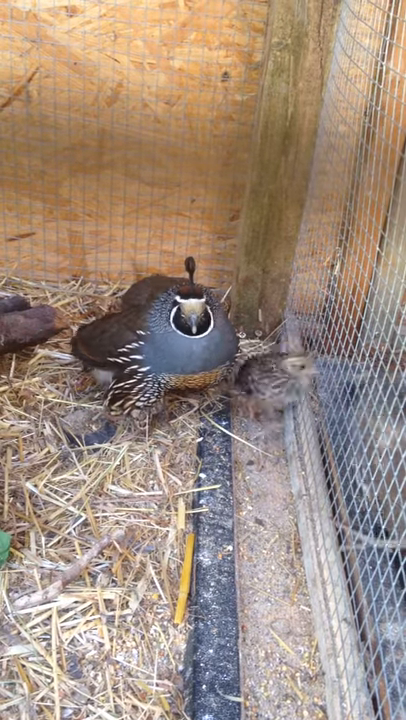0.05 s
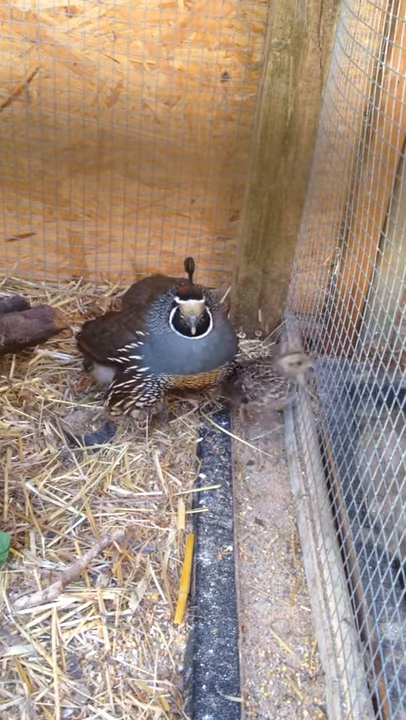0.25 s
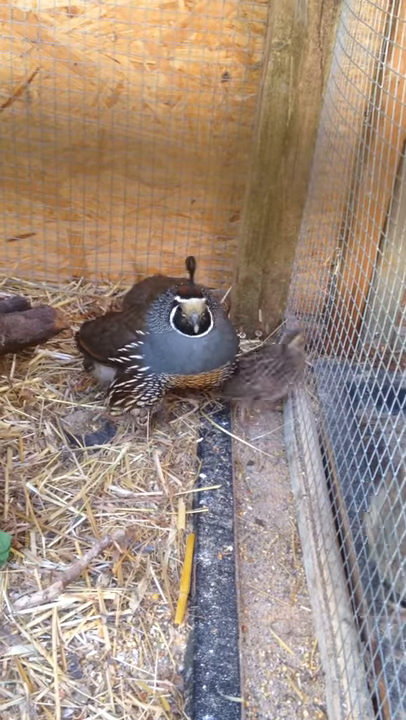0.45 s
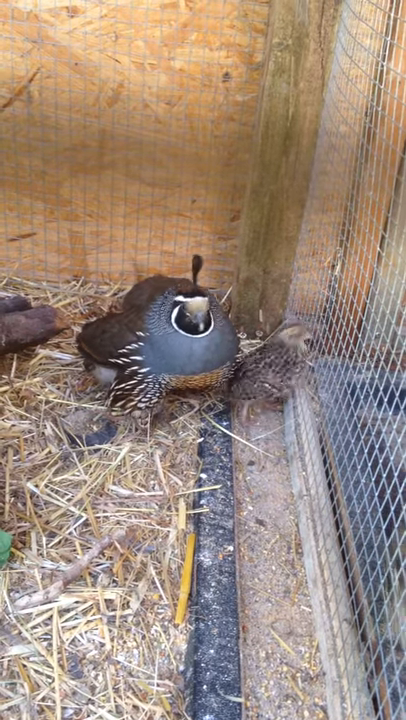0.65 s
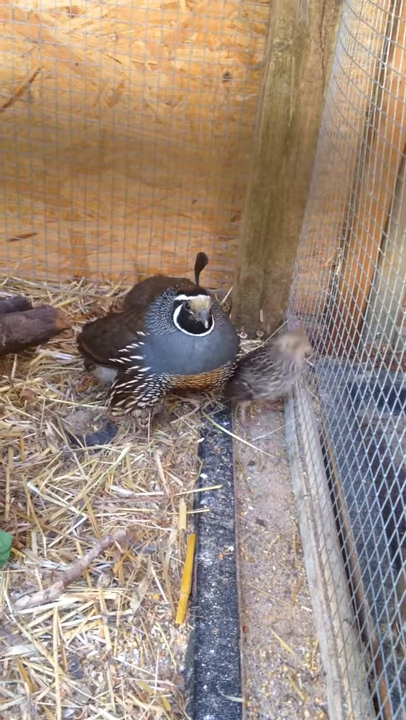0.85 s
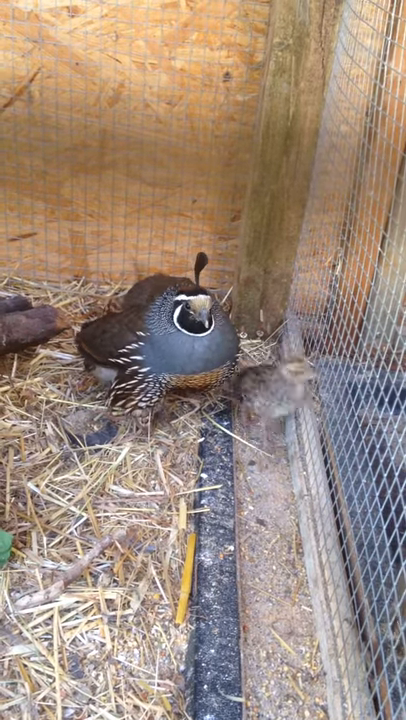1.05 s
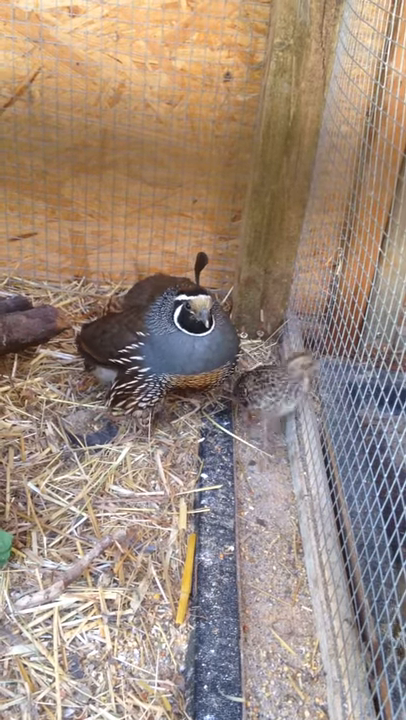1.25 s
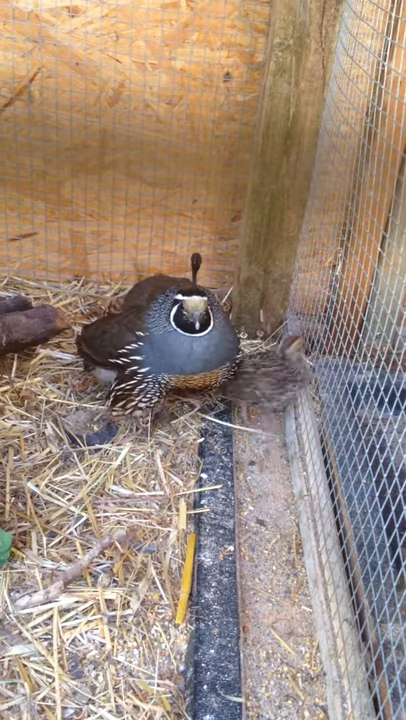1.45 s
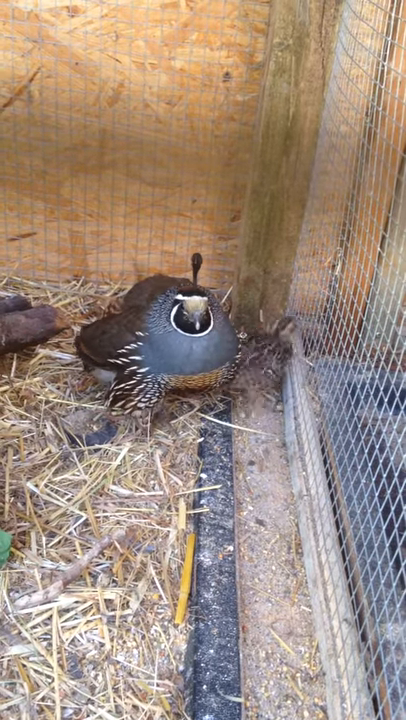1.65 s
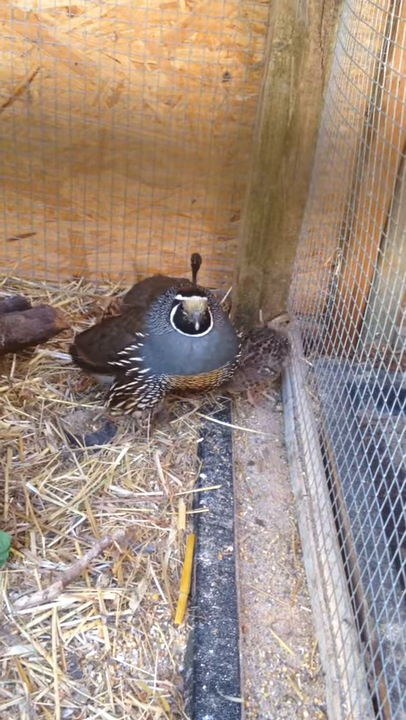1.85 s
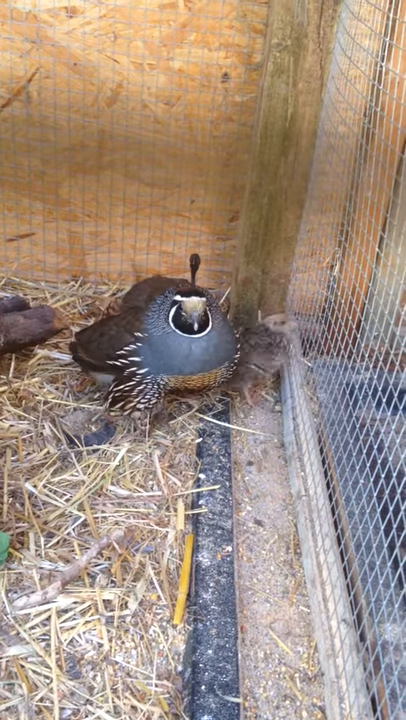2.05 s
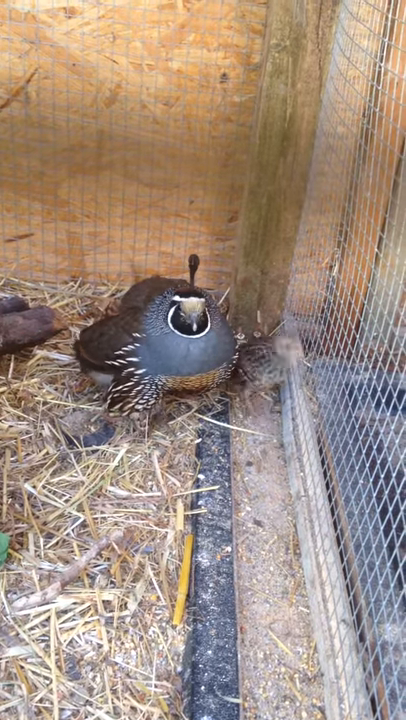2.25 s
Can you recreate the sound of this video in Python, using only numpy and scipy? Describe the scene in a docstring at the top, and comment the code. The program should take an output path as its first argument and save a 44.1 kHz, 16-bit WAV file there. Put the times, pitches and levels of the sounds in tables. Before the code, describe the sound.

Quail feet rustle in straw and bump wooden boards while chicks peep faintly.

```python
"""A quail and her chicks shuffle about in a small pen of plywood, straw and wire mesh.
Over a quiet outdoor hiss and hum, feet scrape through the straw and the chicks whistle faint peeps.
Within half a second comes the loudest scuffle: stalks snap, feet knock the boards into ringing,
claws and beaks rattle the mesh and the floor rumbles. After a lull, a lighter scuffle peaks near
1.5 s; then a few last peeps and one faint tap sound over the hiss."""
import sys
import numpy as np
from scipy import signal
from scipy.fft import rfft, irfft
from scipy.io import wavfile
from scipy.ndimage import uniform_filter1d

SR = 44100
rng = np.random.default_rng(int(sys.argv[2]) if len(sys.argv) > 2 else 0)


def file_out(sig):
    """Save sig as 16-bit WAV at sys.argv[1]."""
    # one column per channel
    cols = np.atleast_2d(sig).T
    # limit, then scale
    lim = np.clip(cols, -1, 1)
    pcm = np.round(lim * 32767).astype(np.int16)
    wavfile.write(sys.argv[1], SR, pcm)


N = 101429
HZ = np.fft.rfftfreq(4096, 1 / SR)


def amp(db):
    """Decibels to gain."""
    return 10 ** (np.asarray(db) / 20)


def unit(x):
    """Scales to rms 1."""
    return x / np.sqrt(np.mean(x ** 2) + 1e-20)


def unit_hit(x):
    """Scales a hit to the energy of 10 ms at rms 1."""
    return x / np.sqrt(np.sum(x ** 2) / (SR / 100) + 1e-20)


def curve(points, hz=HZ):
    """Joins breakpoints along a log-frequency axis."""
    point_hz, value = np.transpose(points)
    return np.interp(np.log(hz + 1), np.log(point_hz + 1), value)


def fader(points):
    """A gain ride through (time_s, level_db) breakpoints."""
    return amp(np.interp(np.arange(N) / SR, *np.transpose(points)))


def hump(centre_hz, spread_oct, hz=HZ):
    """An EQ peak in dB with straight skirts."""
    return 12 * (1 - np.sqrt(1 + (np.log2((hz + 1) / centre_hz) / spread_oct) ** 2))


def colour(x, db):
    """Minimum-phase EQ in the shape of a dB curve, so hits have no pre-ring."""
    log_gain = np.maximum(db - db.max(), -100) * np.log(10) / 20
    mirrored = np.r_[log_gain, log_gain[-2:0:-1]]
    impulse = np.fft.ifft(np.exp(np.conj(signal.hilbert(mirrored)))).real
    return signal.fftconvolve(x, impulse)[:len(x)]


def add(mix, start_s, sound):
    """Places a sound in the mix."""
    part = mix[max(round(start_s * SR), 0):][:len(sound)]
    part += sound[:len(part)]


# Tone of the outdoor air: freq_hz, gain_db
AIR_EQ = [(15, -28), (30, -17.5), (60, 0), (110, -6), (280, -9.5), (625, -14.5), (1100, -17.5), (1500, -18),
          (2100, -19.5), (3100, -17), (4400, -17), (5600, -19), (10000, -20), (15200, -20.5)]

def outdoor_hiss(level_db=-65.5):
    """A steady bed of noise, heaviest in the bass."""
    return amp(level_db) * unit(colour(rng.standard_normal(N), curve(AIR_EQ)))


# Swells of the hum: time_s, gain_db
HUM_SWELL = [(0, -3.5), (.45, -1), (.69, 10.5), (0.789, 6), (.92, -7), (1.07, -2), (1.18, 7), (1.26, -4),
             (1.34, 6.5), (1.65, -8), (1.83, 2.5), (2.0, -1), (2.12, -9), (2.3, 5)]

def low_hum(pitch_hz=56.7, spread_oct=0.14, level_db=-74.5):
    """A narrow band of deep noise that swells and sinks."""
    band = amp(hump(pitch_hz, spread_oct, np.fft.rfftfreq(N, 1 / SR)))
    hum = irfft(rfft(rng.standard_normal(N)) * band, N)
    return amp(level_db) * fader(HUM_SWELL) * unit(hum)


# Rise and fall of the floor rumble: time_s, level_db
RUMBLE_RIDE = [(0, -72.5), (.2, -80.5), (.34, -66), (.39, -56), (.45, -60), (.52, -66.5), (.62, -66),
               (.69, -73), (.75, -75.5), (0.849, -57.5), (.95, -106), (1.25, -75), (1.34, -68), (1.58, -67),
               (1.8, -79.5), (2.3, -97)]

def floor_rumble():
    """The floor rumbles under the birds."""
    rumble = colour(rng.standard_normal(N), hump(centre_hz=128, spread_oct=0.56))
    return fader(RUMBLE_RIDE) * unit(rumble)


# Tone of dry straw: freq_hz, gain_db
STRAW_EQ = [(100, -52), (600, -24.5), (1300, -29), (2000, -20.5), (2550, -11), (3200, -18), (4400, -7.5),
            (5300, -6), (5950, -2.5), (6400, -4.5), (7200, -2), (7800, -3), (8600, 0.5), (10000, -4),
            (11000, -5), (13500, -12.5), (16000, -14)]

def straw_tone(x, tilt_db_per_oct):
    """Gives a sound the crispness of straw, tilted brighter or duller above 1 kHz."""
    return colour(x, curve(STRAW_EQ) + tilt_db_per_oct * np.log2(np.maximum(HZ, 1000)))


def friction(n, ticks_per_s=2200, spread_db=2, smooth_share=0.68):
    """Stick-slip ticks of uneven size over smooth friction noise."""
    ticks = (rng.random(n) < ticks_per_s / SR) * rng.choice([-1, 1], n)
    sizes = amp(spread_db * np.minimum(rng.exponential(1, n), 4))
    smooth = rng.standard_normal(n)
    return np.sqrt(1 - smooth_share) * unit(ticks * sizes) + np.sqrt(smooth_share) * smooth


# Tone of rubbed plywood: freq_hz, gain_db
RUBBED_BOARD_EQ = [(40, -22), (110, -15.5), (200, -3.5), (350, -1.5), (650, 2.5), (900, -0.5), (1200, -1),
                   (1600, -10.5), (2400, -14.5), (4000, -12), (16000, -48)]
# Strokes through the straw: start_s, length_s, straw_db, board_db, tilt_db_per_oct
SCRAPES = [(.0, 0.031, -59, -57.5, -3.5), (0.051, 0.08, -73, -72, -11), (0.193, 0.031, -66.5, -63, 1),
           (0.217, 0.015, -51, -76, 1.5), (0.253, 0.06, -61, -57.5, 2), (0.279, 0.022, -43, -49.5, 5),
           (0.294, 0.045, -55, -58, -6.5), (0.32, .014, -38.5, -39, 6), (0.35, .012, -41.5, -46.5, -8),
           (0.365, 0.05, -62.5, -64, -5), (0.412, .06, -71, -68.5, -7.5), (0.467, 0.03, -60, -70, -11),
           (0.516, 0.053, -68.5, -64.5, 2), (0.583, 0.029, -64.5, -59, -1), (.96, .022, -64, -88, -3),
           (1.068, 0.035, -61, -97, -8.5), (1.329, 0.12, -69.5, -68, -14), (1.445, 0.055, -62, -63, -7),
           (1.496, 0.032, -50.5, -50, -1), (1.529, 0.12, -73, -72.5, -10.5),
           (1.658, 0.069, -71.5, -74.5, -13), (2.005, 0.015, -65, -94, -7)]

def straw_scrapes(attack_s=0.0061, release_s=0.006):
    """Feet and feathers drag through the straw and rub the board beneath."""
    out, t = np.zeros(N), np.arange(SR // 5) / SR
    for start_s, length_s, straw_db, board_db, tilt in SCRAPES:
        attack = np.minimum(t / attack_s, 1)
        release = np.exp(-np.maximum(t - length_s + release_s, 0) / release_s)
        straw = unit(straw_tone(friction(len(t)), tilt))
        board = unit(colour(friction(len(t)), curve(RUBBED_BOARD_EQ)))
        add(out, start_s, attack * release * (amp(straw_db) * straw + amp(board_db) * board))
    return out


# The chicks' calls: start_s, length_s, level_db, first_hz, middle_hz, last_hz
PEEPS = [(0, 0.016, -65.5, 2380, 2350, 2620), (0.02, 0.024, -66, 2545, 3370, 2220),
         (0.059, 0.022, -69, 4350, 3190, 2360), (0.099, 0.017, -75, 3500, 3000, 2850),
         (0.175, 0.045, -63, 2780, 3030, 3260), (0.21, 0.025, -67, 3200, 3940, 4530),
         (0.76, 0.032, -71.5, 2900, 3200, 3680), (0.8, 0.023, -67, 2850, 3220, 3750),
         (0.826, 0.01, -68, 3900, 4170, 4040), (0.963, .013, -70.5, 2920, 2970, 2880),
         (.976, .014, -69.5, 2500, 2500, 2540), (1.015, .016, -67.5, 2320, 2460, 2310),
         (1.016, 0.02, -68.5, 3660, 3615, 3450), (1.214, 0.023, -64.5, 3010, 3110, 3040),
         (1.238, 0.023, -59.5, 2460, 2554, 2420), (1.2635, .028, -68, 2550, 4100, 2580),
         (1.368, 0.0264, -66.5, 2840, 3750, 2720), (1.394, 0.013, -64, 2620, 2610, 2660),
         (1.406, .025, -70, 2750, 4550, 2660), (1.779, 0.052, -73, 2740, 3970, 4570),
         (2.018, 0.027, -63, 2420, 3090, 3300), (2.051, 0.032, -73.5, 3280, 3930, 4230),
         (2.061, 0.026, -59.5, 2530, 2530, 3200), (2.127, 0.029, -75.5, 3730, 4090, 4300)]

def chick_peeps(waver_depth=0.008, flutter_depth=0.15, bend_power=2.13, swell_power=0.42):
    """Thin, slightly unsteady whistles that bend through three pitches."""
    out = np.zeros(N)
    for start_s, length_s, level_db, first_hz, middle_hz, last_hz in PEEPS:
        progress = np.linspace(0, 1, int(length_s * SR))
        drift = unit(uniform_filter1d(rng.standard_normal((2, SR // 5)), size=120))
        waver, flutter = drift[:, :len(progress)]
        arch = abs(np.sin(np.pi * progress))
        glide = first_hz + (last_hz - first_hz) * progress
        bend = (middle_hz - (first_hz + last_hz) / 2) * arch ** bend_power
        pitch_hz = (glide + bend) * (1 + waver_depth * waver)
        whistle = np.sin(2 * np.pi * np.cumsum(pitch_hz) / SR)
        envelope = arch ** swell_power * (1 + flutter_depth * flutter)
        add(out, start_s, amp(level_db) * unit(envelope * whistle))
    return out


# Breaking stalks: break_s, level_db (before the trim), tilt_db_per_oct, decay_s
SNAPS = [(.0098, -52, 6, 0.0011), (.2392, -51.5, -9, 0.005), (0.245, -40, 8.5, 0.0042),
         (.2855, -51, 19, 0.0017), (.291, -46.5, 2, 0.0035), (.3222, -39.5, 0.5, 0.0021),
         (.3284, -40.5, -2.5, 0.0021), (0.3499, -35, -9.5, 0.0021), (0.352, -36, -9.5, 0.0028),
         (0.354, -26, 0.5, 0.0005), (0.504, -49, -4.5, 0.0026), (0.5268, -55, 4, 0.0014),
         (.623, -55, 13, .002), (.637, -61.5, -8.5, 0.0047), (0.7273, -46.5, 2.5, 0.0037),
         (.82, -51.5, -16, 0.0043), (.842, -68, -11, 0.0027), (1.4278, -60, 5, 0.0021),
         (1.4999, -50.5, -8, 0.0017), (1.5086, -51, -1, 0.00067), (1.5189, -46, -4.5, 0.0016),
         (1.623, -62.5, -3, 0.0036), (1.716, -62, -7, 0.0061)]

def straw_snaps(trim_db=-3, strain_db=-20, strain_s=0.0033, crack_height=2.8):
    """A stalk strains for an instant, then breaks: one crack and a quickly dying splinter of noise."""
    lead = SR // 100
    out, t = np.zeros(N), np.arange(-lead, SR // 20) / SR
    strain = amp(strain_db) * np.exp(-abs(t) / strain_s)
    for break_s, level_db, tilt, decay_s in SNAPS:
        envelope = np.where(t < 0, strain, np.exp(-abs(t) / decay_s))
        burst = rng.standard_normal(len(t)) * envelope
        burst[lead] = crack_height
        add(out, break_s + t[0], amp(level_db + trim_db) * unit_hit(straw_tone(burst, tilt)))
    return out


# Resonances of the plywood: pitch_hz, gain_db, t60_s (each knock scales it by its ring_factor)
BOARD_MODES = [(151, -17, 0.19), (190.6, 4, 0.11), (238, 8.5, 0.06), (329.5, 6, 0.067), (398, -7, 0.12),
               (485.4, 5.5, 0.041), (569, 6, 0.044), (682, 0.5, 0.062), (723, -2, 0.053), (880, -27, 0.015),
               (1005, 3, 0.024), (1105, -14, 0.032), (1570, 3, 0.057), (1890, -13, 0.026)]
# Footfalls on the boards: start_s, level_db, centre_hz, spread_oct, ring_factor
KNOCKS = [(.0165, -46.5, 238, 0.38, 0.4), (.2472, -30.5, 513, 0.77, 0.64), (.2905, -44.5, 402, 1.34, 1.1),
          (.3517, -35, 417, 0.72, 0.75), (.3545, -41, 245, 0.88, 0.44), (.5922, -51.5, 760, .3, 0.99),
          (.5925, -48.5, 232, 0.27, 0.73), (.8095, -42.5, 725, 0.16, 0.61),
          (1.5022, -42.5, 675, 0.19, 0.62), (1.5125, -39, 560, 0.32, 0.55), (1.519, -40.5, 664, 0.4, 0.56),
          (1.582, -61, 360, .3, 2.2), (1.624, -61.5, 584, 0.57, .8), (1.678, -61, 402, 0.17, 1.05)]

def board_knocks(attack_s=0.0004):
    """Each footfall rings the board modes near its own centre frequency."""
    out, t = np.zeros(N), np.arange(SR // 3) / SR
    pitch_hz, gain_db, t60_s = np.transpose(BOARD_MODES)[:, :, None]
    attack = 1 - np.exp(-t / attack_s)
    for start_s, level_db, centre_hz, spread_oct, ring_factor in KNOCKS:
        decays = amp(gain_db - 60 * t / (t60_s * ring_factor))
        ring = (decays * np.sin(2 * np.pi * pitch_hz * t)).sum(0)
        knock = colour(ring * attack, hump(centre_hz, spread_oct))
        add(out, start_s, amp(level_db) * unit_hit(knock))
    return out


# Dull taps on the frame and mesh: start_s, level_db, centre_hz, spread_oct, decay_s
TAPS = [(.2, -63, 610, 0.25, 0.016), (0.222, -51, 2000, 0.31, 0.0098), (0.2442, -47, 1950, 0.72, 0.0068),
        (0.3524, -35.5, 1050, 0.36, 0.0016), (0.5021, -54, 1830, 0.54, 0.011),
        (0.537, -54.5, 1480, 1.3, 0.032), (.728, -64.5, 1090, 0.57, 0.026),
        (.8098, -49, 1124, 0.22, 0.0044), (0.841, -57, 1940, 0.77, 0.0064),
        (1.2907, -47.5, 970, 1.11, 0.028), (1.342, -60.5, 1300, 0.49, 0.011),
        (1.423, -59.5, 684, 0.13, 0.028), (1.453, -57, 1110, 0.88, .015), (1.4872, -59, 1020, 0.3, 0.0028),
        (1.4975, -51.5, 755, 0.54, 0.0071), (1.5124, -48, 1370, 0.37, 0.0083),
        (2.265, -67, 920, 0.25, 0.0054)]

def mesh_taps():
    """Claws and beaks set off a short dense rattle in the frame and mesh."""
    out, t = np.zeros(N), np.arange(SR // 5) / SR
    for start_s, level_db, centre_hz, spread_oct, decay_s in TAPS:
        rattle = rng.standard_normal(len(t)) * np.exp(-t / decay_s)
        add(out, start_s, amp(level_db) * unit_hit(colour(rattle, hump(centre_hz, spread_oct))))
    return out


# Reverb time of the pen: freq_hz, t60_s
PEN_DECAY = [(150, 0.2), (600, 0.11), (2500, .13), (8000, 0.061), (15000, 0.086)]

def pen_reverb(send, build_s=0.0055):
    """A short diffuse tail builds between the close walls."""
    t = np.arange(SR // 2) / SR
    hz, frame_s, noise = signal.stft(rng.standard_normal(len(t)), SR, nperseg=256)
    decays = amp(-60 * frame_s / curve(PEN_DECAY, hz)[:, None])
    tail = signal.istft(noise * decays, SR, nperseg=256)[1][:len(t)]
    tail *= np.minimum(t / build_s, 1)
    return signal.fftconvolve(send, tail / np.linalg.norm(tail))[:N]


def scene():
    """Mono mix: the birds and the ring of their pen over hiss, hum and rumble."""
    hits = board_knocks() + mesh_taps()
    straw = straw_snaps() + straw_scrapes()
    chicks = chick_peeps()
    reverb = pen_reverb(amp(-14.5) * hits + amp(-12) * straw + amp(-9.5) * chicks)
    bed = outdoor_hiss() + low_hum() + floor_rumble()
    return (hits + straw + chicks + reverb + bed)[None]


def record(dry):
    """A steep high cut takes off the very top."""
    cutoff_hz = 15350
    high_cut = signal.firwin(401, cutoff_hz, window=("kaiser", 8), fs=SR)
    return signal.oaconvolve(dry, high_cut[None], "same")


dry = scene()
out = record(dry)
file_out(out)
```